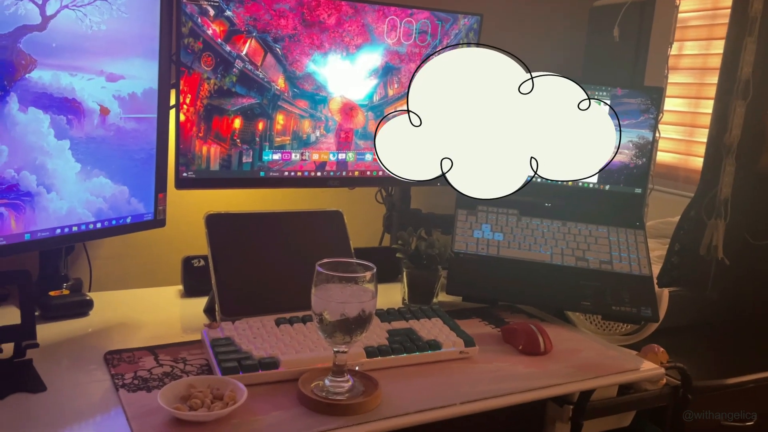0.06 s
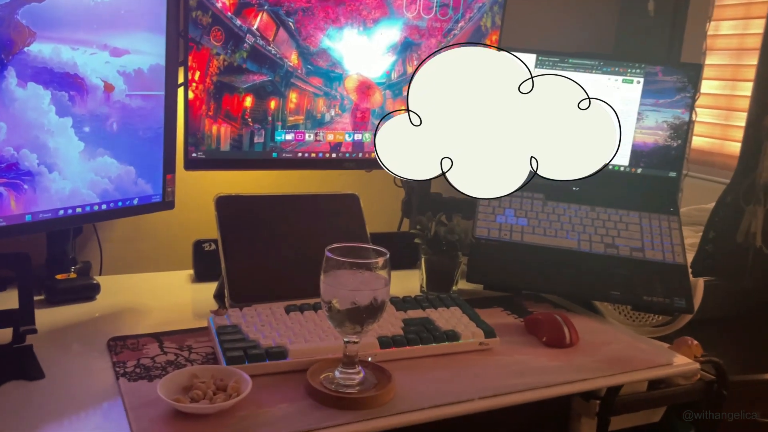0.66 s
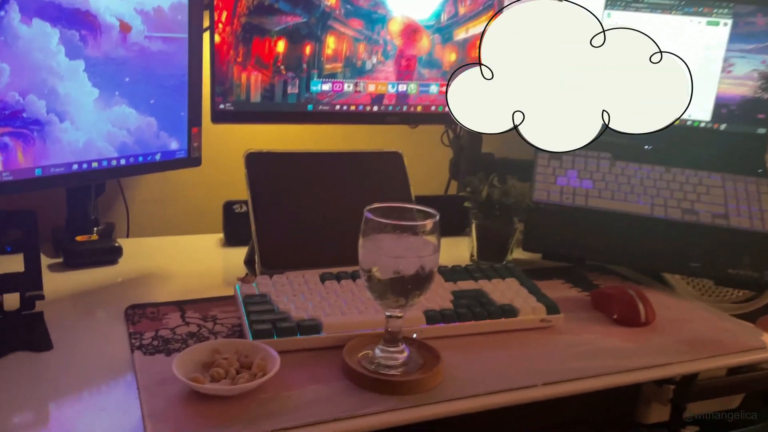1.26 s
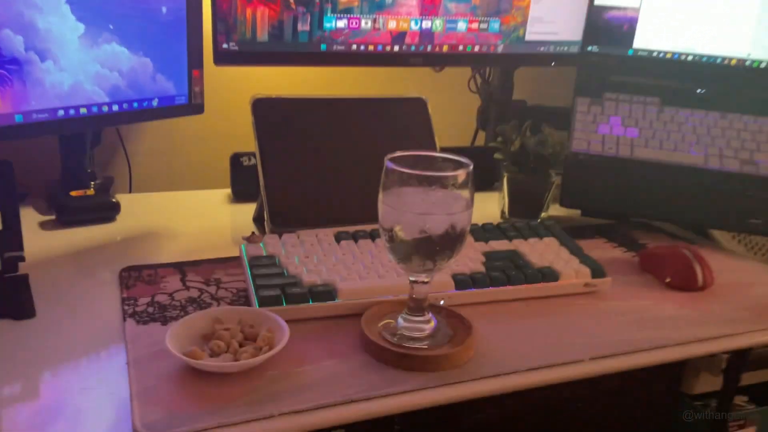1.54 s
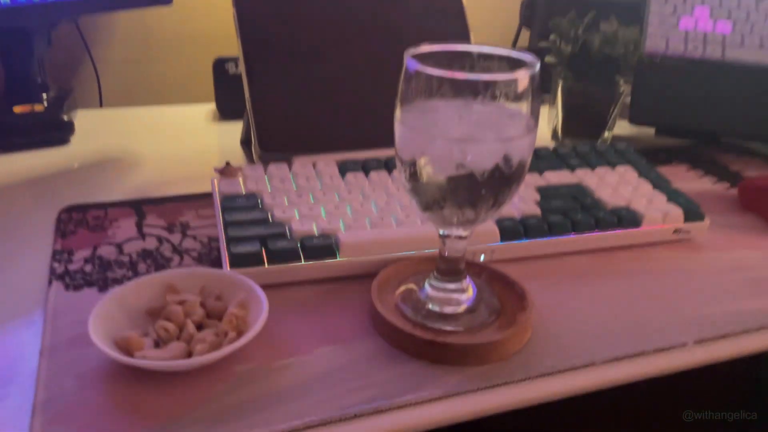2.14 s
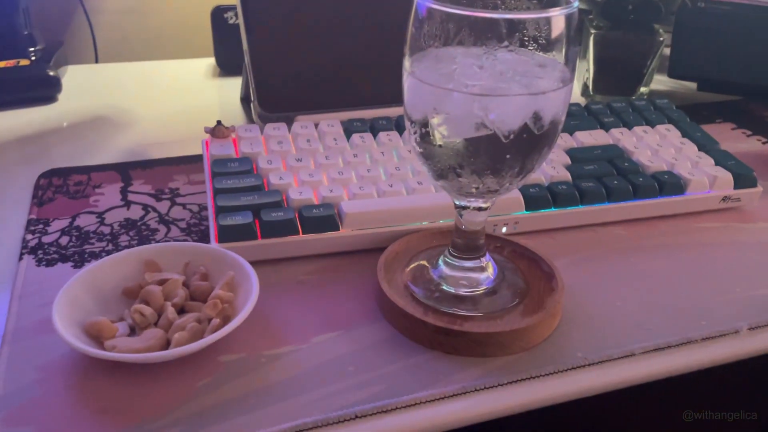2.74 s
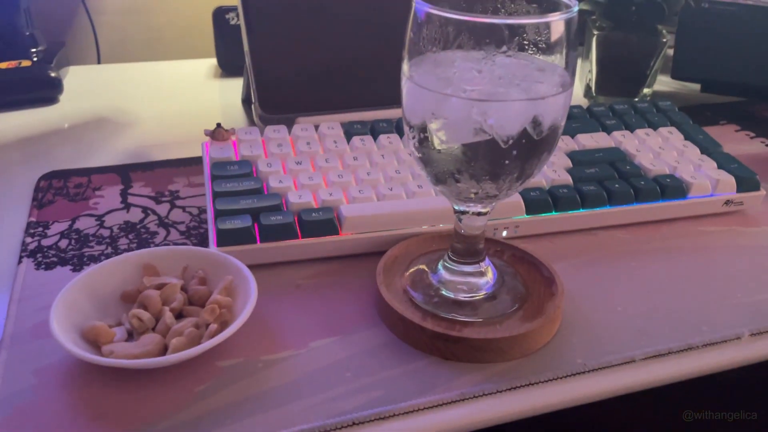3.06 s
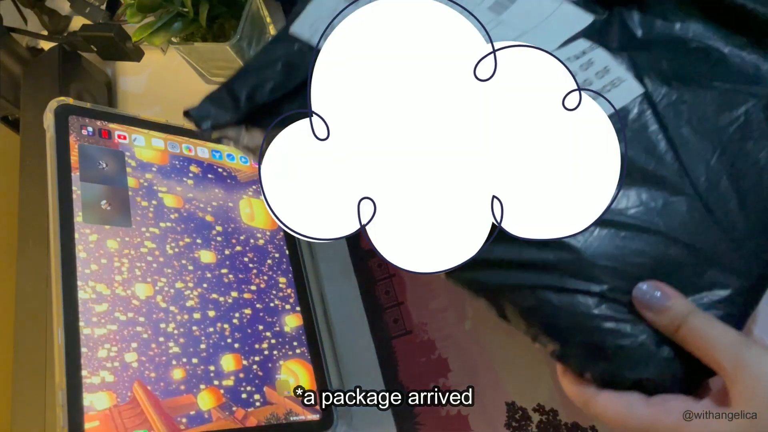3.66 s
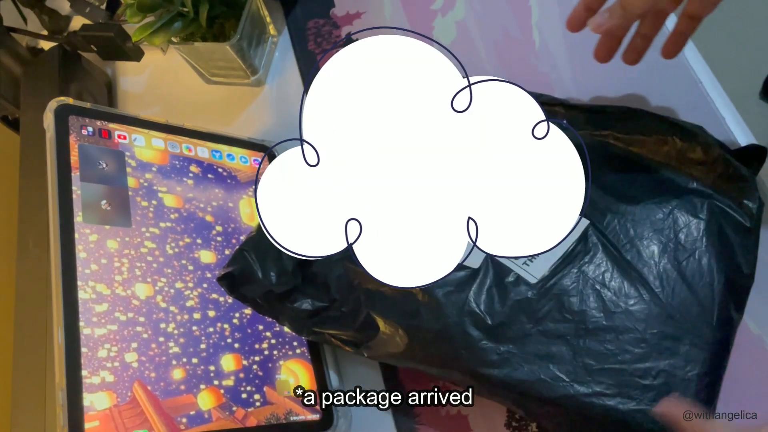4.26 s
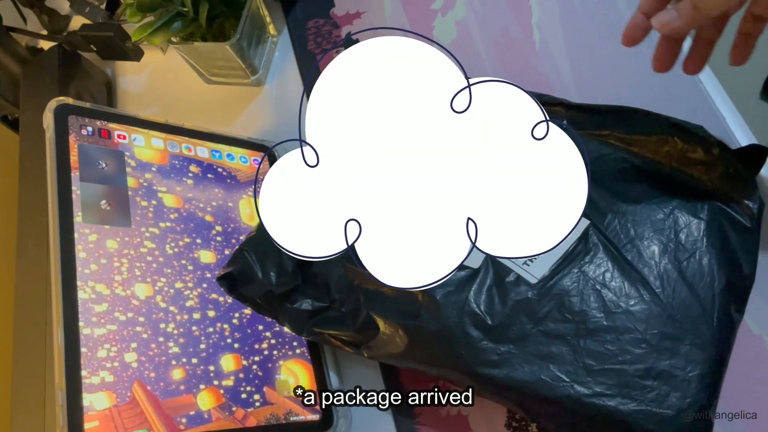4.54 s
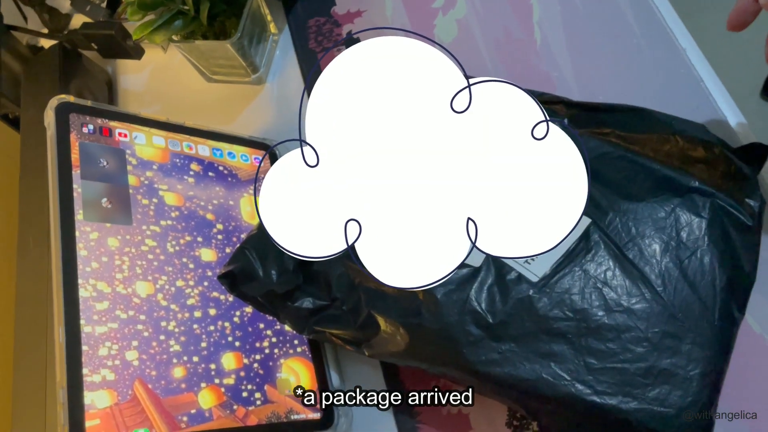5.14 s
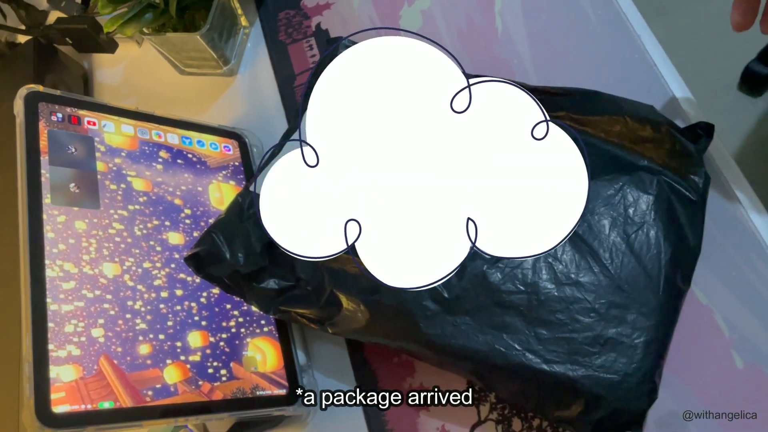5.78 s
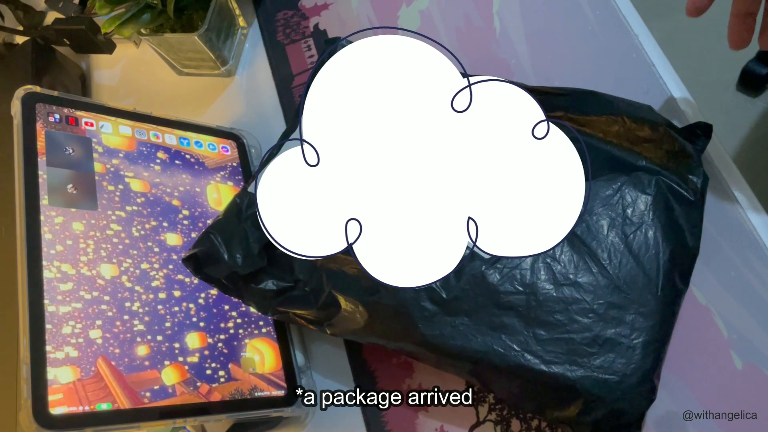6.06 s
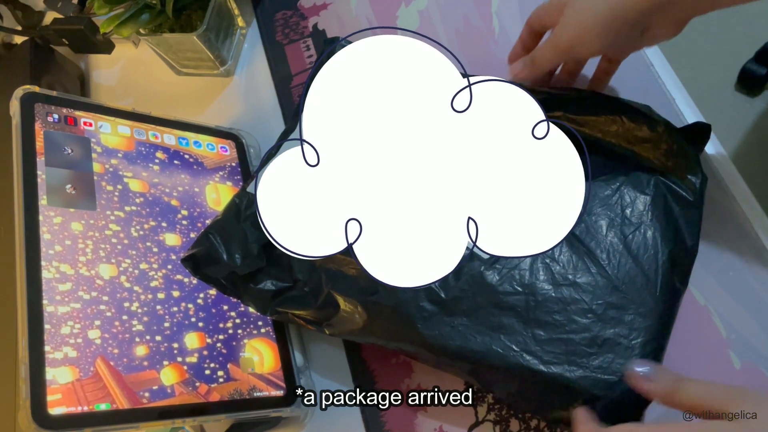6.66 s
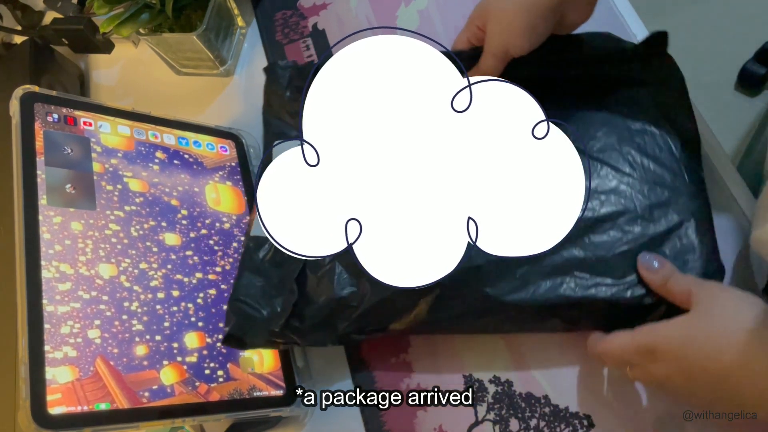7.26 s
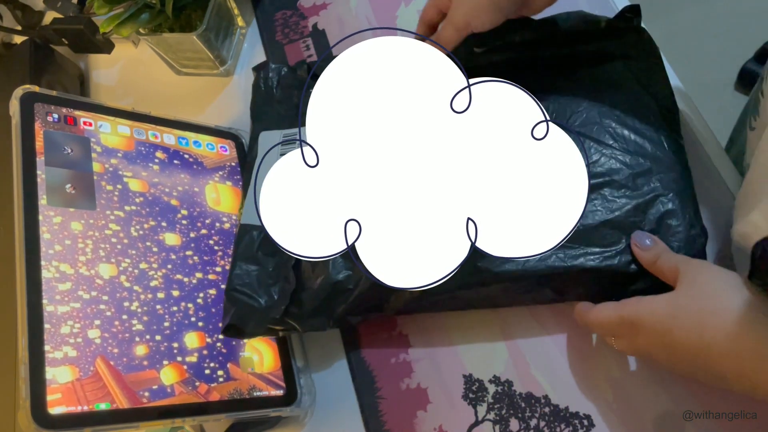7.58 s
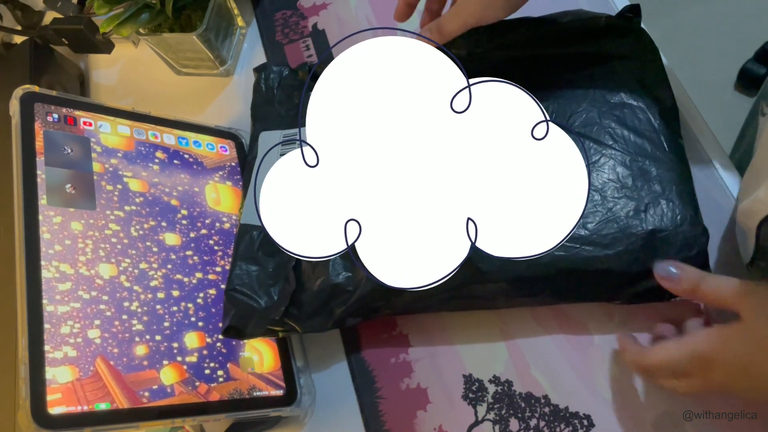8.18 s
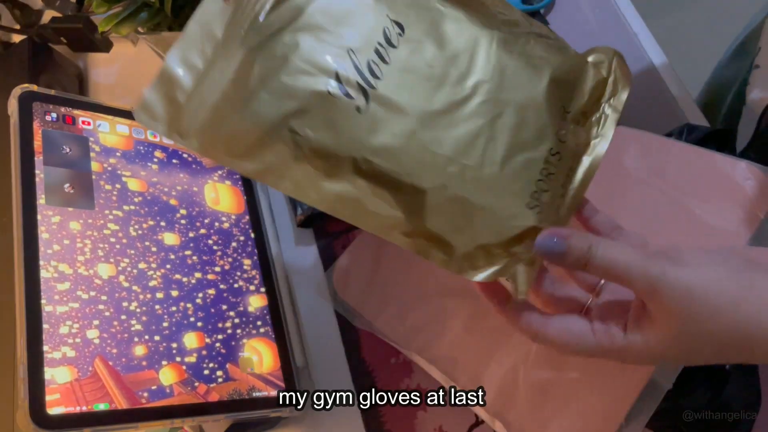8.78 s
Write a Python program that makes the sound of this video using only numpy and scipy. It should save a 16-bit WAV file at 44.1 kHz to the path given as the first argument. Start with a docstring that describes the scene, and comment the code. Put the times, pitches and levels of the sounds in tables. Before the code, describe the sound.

In a small room, cooling hums and computer fans faintly whine. The background turns quieter, with a throbbing fan, as two loud taps strike the microphone's housing. A parcel in a plastic mailer crinkles and drops onto a desk with a slap. After a pause it is gripped and slid around, the film snapping and rustling. Finally a stiff foil pouch gives a few dry clacks. Everything is close, in stereo.

```python
"""Parcel on an office desk

Close up at a desk in a small room, on a camera's stereo microphone. Cooling hums and computer fans whine;
at 3.27 s the scene changes to a quieter room tone with a fan throbbing behind. Two taps ring the camera's
case. A parcel in a plastic mailer is carried in, dropped, gripped and slid round, its film buckling
and snapping. The scene cuts again at 8.37 s, and a stiff foil pouch is handled and clacks."""
import sys
import numpy as np
from scipy import signal
from scipy.fft import rfft, irfft, next_fast_len
from scipy.io import wavfile
from scipy.ndimage import uniform_filter1d, map_coordinates

SR = 44100
rng = np.random.default_rng(int(sys.argv[2]) if len(sys.argv) > 2 else 0)


def master(y):
    """Save y as 16-bit WAV."""
    cut = np.clip(np.atleast_2d(y).T, -1, 1)
    pcm = np.round(cut * 32767)  # scale
    wavfile.write(sys.argv[1], SR, pcm.astype(np.int16))


N = 388521

# stereo width of the room at the microphone: f/Hz, side against mid/dB
ROOM_WIDTH = [(60, -13), (110, -20.5), (200, -5), (380, -3.5), (700, -3), (1300, -1), (2400, -1.5),
              (4400, -6), (8000, -2.5), (15000, 3.5)]


def mailer_rustle():
    """Each motion works the film: small creases give the bright crinkle, the bending sheet its body."""
    # carried, lowered, left to relax, gripped, slid round, let go; then the pouch is held:
    # t/s, length/s, crinkle/dB, sheet/dB, share of smooth sliding/0-1
    moves = [(3.269, 0.18, -46, -45.5, 0.3), (3.478, 0.16, -47, -51.5, 0.1), (3.663, .19, -63, -59, 0.1),
             (4.017, .19, -39, -41.5, .7), (4.298, 0.14, -73.5, -66, .3), (5.198, .55, -74, -60.5, .3),
             (6.707, .32, -51.5, -50.5, .45), (7.027, 0.16, -44, -49.5, .85), (7.211, .1, -48.5, -46, .75),
             (7.324, .26, -51, -51.5, 0.6), (7.677, 0.18, -63, -56, 0.33), (7.952, 0.17, -56, -54.5, 0.4),
             (8.145, .2, -72.5, -71, .5), (8.391, .4, -67, -60, 0.5)]
    # the parcel lands on one edge, then flops flat: same columns
    landing = [(4.127, 0.017, -23.5, -21, 0.8), (4.15, 0.0072, -27, -28, 0.65)]
    # a panel gives way under the fingers: t/s, crinkle/dB, sheet/dB
    crumples = [(3.298, -46.5, -41), (3.325, -46.5, -42), (3.348, -45.5, -40), (3.384, -44.5, -48),
                (3.523, -41.5, -42.5), (3.563, -48.5, -46), (3.762, -59.5, -49.5), (6.673, -48, -43),
                (6.759, -44.5, -50), (6.826, -45, -49), (6.873, -49.5, -48.5), (6.966, -43, -43),
                (7.525, -50, -58), (7.58, -51.5, -54), (7.795, -59.5, -53), (8.364, -53.5, -49.5),
                (8.59, -49, -45.5), (8.69, -60, -52)]
    # spectra of the crinkle and of the bending sheet: f/Hz, level/dB
    crinkle_spectrum = [(700, -26), (1600, -17), (2600, 3.5), (5000, 3.5), (7000, 2.5), (11000, -0.5),
                        (13600, -5.5), (15500, -30.5)]
    sheet_spectrum = [(120, -17), (300, -8), (520, 4), (900, -2.5), (1800, -2), (2800, -10), (5000, -33.5)]
    crumple_hold_s, crumple_slide = 0.011, 0.27
    crumpling = [(s, crumple_hold_s, *levels, crumple_slide) for s, *levels in crumples]
    bright, body, sliding = np.zeros((3, N))
    # rise and fall in dB/s
    for motions, rise, fall in [(moves, 381, 338.5), (crumpling, 1900, 522.5), (landing, 1000, 650)]:
        for s, length, crinkle_db, sheet_db, slide in motions:
            power = power_envelope(s, length, rise, fall)
            bright += amp(crinkle_db) ** 2 * power
            body += amp(sheet_db) ** 2 * power
            sliding += slide * amp(crinkle_db) ** 2 * power
    share = np.clip(sliding / bright, 0, 1)
    crinkle = film(crinkle_spectrum, share, per_second=2000, scatter_db=6.5, clump_db=5, ring_db=3.5)
    sheet = film(sheet_spectrum, share, per_second=2200, scatter_db=3, clump_db=5.5, ring_db=2)
    return amp(0.5) * np.sqrt(bright) * crinkle + amp(0.14) * np.sqrt(body) * sheet


def film(spectrum, slide_share, per_second, scatter_db, clump_db, ring_db):
    """Plastic film in motion: clumps of tiny buckles over the even hiss of sliding."""
    sizes = amp(scatter_db * np.minimum(rng.exponential(size=(2, N)), 3)) * rng.choice([-1, 1], (2, N))
    buckles = sizes * (rng.random((2, N)) < per_second / SR)
    buckles *= amp(clump_db * np.tanh(wobble(110)))
    # facets of changing size ring for a moment, each at its own pitch
    ringing = unit(patchy(buckles, ring_db, frame=256, cells=4))
    motion = np.sqrt(1 - slide_share) * ringing + np.sqrt(slide_share) * noise()
    return spread(motion, spectrum, side_db=-2)


def creases():
    """Each snapping crease cracks and rings its own small patch of film for a few cycles."""
    # the sharpest snaps and ticks, most of them creases: t/s, level/dB, f/Hz
    snaps = [(1.627, -32.5, 1610), (2.404, -44, 12000), (2.435, -32, 9800), (2.452, -36, 8000),
             (2.465, -30, 7600), (2.481, -34, 7540), (3.2565, -24.5, 3000), (3.344, -19.5, 4320),
             (3.357, -33, 9000), (3.444, -22, 6300), (3.484, -15.5, 6100), (3.498, -25, 5600),
             (3.525, -26, 1890), (3.563, -31, 2010), (3.603, -24, 11400), (3.646, -30.5, 6100),
             (3.671, -30.5, 4730), (3.728, -34.5, 4100), (3.692, -41, 9000), (3.7632, -29.5, 3180),
             (3.834, -33, 2700), (3.849, -38, 2700), (4.0052, -20, 4540), (4.017, -26, 4200),
             (4.0455, -16.5, 4830), (4.1289, -10, 1400), (4.1593, -8.5, 2220), (4.193, -17, 5000),
             (4.360, -37, 3010), (4.535, -39.5, 4330), (6.6706, -26, 4220), (6.6777, -25, 2140),
             (6.7015, -34, 2790), (6.751, -22.5, 4870), (6.768, -24, 4200), (6.8178, -28.5, 2770),
             (6.833, -29, 2800), (6.85, -29, 4600), (6.875, -31, 2150), (6.882, -29.5, 4000),
             (6.913, -37, 9000), (6.93, -25, 3100), (6.944, -25, 5100), (6.9665, -24, 4970),
             (6.975, -30, 1910), (7.022, -26, 3080), (7.108, -31, 3200), (7.22, -26.5, 1660),
             (7.242, -25, 1880), (7.26, -29, 10500), (7.294, -22.5, 3460), (7.34, -35, 9500),
             (7.3698, -27.5, 3170), (7.379, -33, 3400), (7.415, -33, 4120), (7.472, -27.5, 2970),
             (7.477, -31.5, 3600), (7.527, -34, 5600), (7.5856, -32, 2250), (7.709, -38, 3520),
             (7.732, -39, 4300), (7.787, -38, 1720), (7.80, -36, 4300), (7.986, -32.5, 5600),
             (8.02, -42, 1950), (8.0736, -27, 2820), (8.362, -43, 6040)]
    ring_cycles, ring_db = 10, -14
    track, t = np.zeros((2, N)), np.arange(8192) / SR
    onset = 1 - np.exp(-t / 0.0005)
    for s, db, hz in snaps:
        # smaller patches and harder snaps are brighter
        top_db = np.clip(-6 + 3.5 * np.log2(hz / 4000) + 0.24 * (db + 25), -20, 6)
        spectrum = [(300, -7), (1500, -2), (6000, -4.5), (13000, top_db), (16000, top_db - 13)]
        snap = coloured(burst(t60=0.011, width=0.51, hold=0.0011) * onset, spectrum)
        upper_hz = hz * rng.uniform(1, 1.5)
        patch = lambda f: 0.43 + resonance(f, hz, 0.13 * hz) + 0.7 * resonance(f, upper_hz, 0.25 * hz)
        ring = damped_sine(t, hz, ring_cycles / hz) * (1 - np.exp(-t * hz / 2))
        add(track, s, unit(filtered(snap, patch)) + amp(ring_db) * unit(ring), db - 0.5)
    return track


def desk_knocks():
    """Heavy, damped contacts with the desk: a few cycles of ring and a dull puff."""
    # dull knocks: t/s, level/dB, f/Hz, t60/s
    contacts = [(1.626, -27, 560, 0.044), (3.329, -27.5, 200, .04), (4.075, -27.5, 606, .02),
                (4.092, -34, 190, 0.034), (4.128, -11.5, 600, 0.014), (4.136, -14.5, 137, 0.041),
                (4.139, -18, 405, 0.014), (4.153, -25, 150, 0.03), (4.139, -20.5, 72, 0.15),
                (4.157, -18, 505, 0.025), (4.174, -26.5, 128, 0.14), (4.206, -32, 650, 0.031),
                (5.264, -38.5, 700, 0.064), (5.265, -35, 440, 0.034), (5.267, -25, 198, 0.06),
                (7.2455, -20, 724, 0.016), (7.2705, -26, 730, 0.02), (7.4395, -29, 690, 0.019)]
    track, t = np.zeros((2, N)), np.arange(8192) / SR
    for s, db, hz, t60 in contacts:
        ring = damped_sine(t, hz, t60) * (1 - np.exp(-t * hz * 2))
        puff = filtered(burst(t60 * 1.58, width=0.89), lambda f: resonance(f, 0.67 * hz, 1.8 * hz) ** 2)
        add(track, s, unit(ring) + 0.44 * unit(puff), db + 0.1)
    return track


def foil_pouch():
    """Stiff foil flips in quick dry steps, each a crack and a short ring; the gentle ones are duller."""
    # the pouch buckles: t/s, level/dB, cutoff/Hz
    clacks = [(8.4209, -33, 1000), (8.4293, -26.5, 3200), (8.461, -37, 2500), (8.5688, -33, 3000),
              (8.5748, -13, 14000), (8.576, -14, 9000), (8.5802, -18.5, 2410), (8.6763, -23.5, 5460),
              (8.6798, -25, 5000), (8.718, -35.5, 2500)]
    # spectrum of the crack: f/Hz, level/dB
    crack_spectrum = [(60, -25), (150, 2), (300, -7), (600, 1.5), (950, -2), (1400, 0), (2200, 1),
                      (2900, -6.5), (3900, 0.5), (5200, -5), (6800, -1.5), (8500, -9.5), (11500, -6),
                      (16000, -24)]
    # modes of the foil panel: f/Hz, width/Hz, level/dB
    modes = [(643, 230, -3), (1420, 380, -0.5), (2200, 600, -4), (4000, 420, -4), (5130, 740, -7),
             (6560, 890, -0.5)]
    track = np.zeros((2, N))
    flip = np.ones((2, 1)) * signal.unit_impulse(8192)
    panel = lambda f: sum((-1) ** k * amp(db) * resonance(f, hz, width)
                          for k, (hz, width, db) in enumerate(modes))
    ring = amp(-5.5) * unit(filtered(flip, panel))
    for s, db, cutoff_hz in clacks:
        crack = unit(coloured(burst(t60=0.019, width=0.41, hold=0.0011), crack_spectrum))
        add(track, s, filtered(crack + ring, lambda f: 1 / (1 + 1j * f / cutoff_hz) ** 2), db)
    return track


def camera_taps():
    """A tap reaches the microphone straight through the case: a hard ringing click and a hollow thud."""
    # two taps and their rebounds: t/s, click/dB, thud/dB, low ring/dB, high ring/dB
    strikes = [(3.2845, 0.5, -12.5, -16.5, 1.5), (3.2908, -20, -37, -31.5, -25),
               (3.4112, -2.5, -16.5, -6.5, -4.5), (3.4195, -19.5, -35.5, -23.5, -25),
               (3.4358, -32, -35, -28.5, -34)]
    # spectrum of the click: f/Hz, level/dB
    click_spectrum = [(300, -9), (600, -9), (950, 2), (1400, -16), (2400, 1), (3400, -21), (4100, -7),
                      (4800, 4), (6000, 1.5), (7200, -8.5), (8300, -0.5), (12000, -3), (14300, 4),
                      (16000, -4)]
    # low and high ring of the case: f/Hz, width/Hz
    rings = [(5250, 1900), (14400, 2200)]
    # hollow modes of the case: f/Hz, level/dB, t60/s
    modes = [(127.7, -5, 0.13), (204.6, -0.5, 0.0744), (333.6, -5, 0.076), (493, -16.5, .06),
             (867, -4, .04), (970, -6, .035), (2294, -2, .018)]
    track, t = np.zeros((2, N)), np.arange(SR // 4) / SR
    thud = sum((-1) ** k * amp(db) * damped_sine(t, hz, t60) for k, (hz, db, t60) in enumerate(modes))
    thud *= 1 - np.exp(-t / 0.0005)
    for s, click_db, thud_db, *rings_db in strikes:
        add(track, s, coloured(burst(t60=0.01, width=0.065, hold=0.0015), click_spectrum), click_db)
        for (hz, width), db in zip(rings, rings_db):
            impact = burst(t60=0.0078, width=0.046, hold=0.00067)
            add(track, s, filtered(impact, lambda f: resonance(f, hz, width) ** 2), db)
        add(track, s, thud, thud_db)
    return track


def throbbing_fan():
    """Behind the desk, over mains hum and soft air, each fan turn thumps its housing and chops a whine."""
    # resonances of the housing: f/Hz, width/Hz, level/dB
    housing = [(179.8, 40, -18), (241, 24, -3.5), (319, 21, 5), (358.9, 21.3, 8), (487, 69, -9),
               (622, 30, -9), (720, 73, -24)]
    # lines of the whine, lines of the mains, spectrum of the air: f/Hz, level/dB
    whine_lines = [(1308, -69), (1330, -65), (1680, -75.5), (1906, -73), (2155, -78), (2638, -80.5),
                   (3400, -83.5)]
    mains_lines = [(118.4, -57.5), (177.6, -63.5), (240, -62), (597.5, -67.5), (840, -72)]
    air_spectrum = [(22, -38.5), (36, -10), (65, -7), (150, -9), (230, -15), (280, -16), (355, -12),
                    (400, -24), (490, -17.5), (700, -24.5), (1400, -24), (3000, -31.5), (6000, -42),
                    (9600, -51), (12800, -48), (15000, -69)]
    # the whine slowly recedes; the lowest hum wavers and drops out briefly: t/s, level/dB
    whine_levels = [(4.3, 3), (5.3, 1), (7.3, -.5), (7.9, -1.5), (8.8, -4)]
    hum_levels = [(3.3, -43.5), (3.95, -49), (4.36, -48), (4.6, -46), (4.68, -63), (4.83, -41.5),
                  (5.0, -48), (5.06, -55), (5.15, -45), (5.55, -46), (5.68, -52), (6.03, -49), (6.18, -45),
                  (6.3, -48), (6.54, -47.5), (6.65, -61), (6.72, -48), (6.95, -44), (7.02, -59),
                  (7.08, -51), (7.14, -58), (7.22, -47), (7.34, -49), (7.42, -42.5), (7.75, -46.5),
                  (8.55, -49.5), (8.8, -58)]
    # the scene cuts again, and the throb resumes at another point in its turn
    turns_per_s, cut_s, cut_offset_turns = 11.99, 8.37, 0.45
    turns = (clock() - 4.341) * turns_per_s + cut_offset_turns * (clock() > cut_s)
    beats = np.diff(np.floor(turns), prepend=np.floor(turns[0])) * amp(wobble(5.4))
    throb = amp(-53.5) * resonant_bands(beats, housing)
    chop = 1 + 0.25 * np.cos(2 * np.pi * turns)
    whine = fader(whine_levels) * tones(whine_lines, drift=0.02, waver_db=1, blur=0.46) * chop
    air = amp(-51.5 + wobble(4.4)) * spread(noise(), air_spectrum, side_db=1.4)
    hum = fader(hum_levels) * tones([(60.2, 0)], drift=0.05, waver_db=2.5, blur=0.1)
    mains = amp(2) * tones(mains_lines, drift=0.0073, waver_db=0.95)
    return air + hum + throb + whine + mains


def computer_fans():
    """Small fans whirr up and ease off; their whines swell and fade as the camera moves over the desk."""
    # passing whines: t/s, length/s, f/Hz, level/dB
    passing_lines = [(0, 0.43, 2376, -62), (.1, 0.47, 2034, -65), (.6, .55, 2150, -62.5),
                     (.87, .42, 2335, -58), (1.5, 0.47, 2335, -59.5), (1.703, .3, 2022, -62),
                     (2.45, .8, 2318, -60), (2.6, 0.61, 2368, -63.5), (2.452, .75, 4790, -68.5)]
    # faint lasting whines: f/Hz, level/dB
    faint_lines = [(3009, -76.5), (3420, -77.5), (3760, -77.5), (4000, -76), (4330, -67), (4511, -76.5),
                   (4748, -73.5)]
    # bands of the whirr: f/Hz, width/Hz, level/dB
    whirr_bands = [(1141, 670, -1.5), (2030, 50, -2), (2108, 330, -1.5), (2672, 150, -12)]
    # swell of the whirr: t/s, level/dB
    whirr_levels = [(0, -74.5), (.5, -67), (.9, -61), (1.3, -54), (1.65, -55), (1.95, -57), (2.201, -56.5),
                    (3.2, -57.5)]
    whirr = resonant_bands(spread(noise(), [(1000, 0)], side_db=2), whirr_bands)
    track = amp(2.5) * fader(whirr_levels) * whirr
    for s, length, hz, db in passing_lines:
        swell = np.sqrt(power_envelope(s, length, rise=69.5, fall=69.5))
        track += swell * tones([(hz, db)], drift=0.035, waver_db=3, blur=0.7)
    return track + tones(faint_lines, drift=0.03, waver_db=3, blur=0.99)


def cooling():
    """The room's cooling: motor hum, and rushing air that fades as the camera moves away."""
    # lines of the motors and spectrum of the air: f/Hz, level/dB
    motor_lines = [(58.5, -49.5), (91.5, -48.5), (119, -41), (209.9, -50), (344.5, -55), (452, -58),
                   (581, -59), (867, -64.5), (926, -62.5), (1217, -66.5)]
    air_spectrum = [(22, -38), (45, -11), (76, -9), (108, -8.5), (132, -1.5), (165, -11), (198, -1),
                    (255, -13.5), (296, -15.5), (346, -8), (400, -18.5), (581, -16), (800, -23),
                    (1340, -28.5), (2700, -32), (4400, -34), (6500, -38.5), (8400, -49.5), (13200, -50),
                    (14600, -70)]
    fade_db_per_s = 0.47
    air = spread(patchy(noise(), depth_db=1.68, frame=2048, cells=8), air_spectrum, side_db=0.95)
    air *= amp(-36.5 - fade_db_per_s * clock() + 0.55 * wobble(7))
    return air + amp(0.5) * tones(motor_lines, drift=0.024, waver_db=1.8)


def room(x):
    """The small room's short answer, 4 ms late and dying sooner in the treble."""
    # decay of the room: f/Hz, t60/s
    decay = [(150, 0.34), (1500, 0.1996), (6000, 0.21), (14000, 0.0958)]
    hz, t, bins = signal.stft(noise(SR // 2), SR, nperseg=256)
    tail = signal.istft(bins * amp(-60 * t / along(decay, hz)[:, None]), SR, nperseg=256)[1]
    tail = np.pad(tail / np.linalg.norm(tail[0]), ((0, 0), (SR // 250, 0)))
    return signal.fftconvolve(x, tail, axes=1)[:, :N]


def microphone_ports(x):
    """The two ports cancel one treble band in their sum and another in their difference."""
    dip = lambda f, hz, width: 1 - 0.9 * resonance(f, hz, width)
    lift = lambda f: 1 + 0.6 * resonance(f, 8200, 1530)
    mid = filtered((x[0] + x[1]) / 2, lambda f: dip(f, 8200, 2511))
    side = filtered((x[0] - x[1]) / 2, lambda f: dip(f, 11515, 2200) * lift(f))
    return np.array([mid + side, mid - side])


def tones(lines, drift, waver_db, blur=0):
    """Wandering machine lines, blurred by turbulence, that reach the two ports with different phases."""
    t, track = clock(), np.zeros((2, N))
    for hz, db in lines:
        phase = 2 * np.pi * (hz * t + rng.random()) + drift * np.sqrt(hz) * wobble(5) + blur * wobble(45)
        offset = np.arctan(amp(along(ROOM_WIDTH, hz) - 5)) * rng.choice([-1, 1])
        gain = np.sqrt(2) * amp(db + waver_db * wobble(2.982))
        track += gain * np.sin([phase + offset, phase - offset])
    return track


def amp(db):
    """Decibels to gain."""
    return 10 ** (np.asarray(db) / 20)


def unit(x):
    """Scale to rms 1."""
    return x / np.sqrt(np.mean(x ** 2) + 1e-20)


def along(points, hz):
    """Read (f/Hz, value) points on a log frequency axis."""
    f, values = np.transpose(points)
    return np.interp(np.log(hz + 1), np.log(f + 1), values)


def clock():
    """The time of every sample."""
    return np.arange(N) / SR


def noise(size=N):
    """Two unrelated white noises."""
    return rng.standard_normal((2, size))


def wobble(rate):
    """A smooth random curve, rate knots a second."""
    return map_coordinates(rng.standard_normal(int(N * rate / SR) + 4), [clock() * rate])


def fader(points):
    """Gain that follows (t/s, level/dB) points."""
    return amp(np.interp(clock(), *np.transpose(points)))


def power_envelope(s, length, rise, fall):
    """Power that rises until time s, holds for its length and dies away; slopes in dB/s."""
    t = clock() - s
    db = np.minimum(rise * t, 0) - fall * np.maximum(t - length, 0)
    return amp(np.maximum(db, -150)) ** 2


def damped_sine(t, hz, t60):
    """One mode ringing down."""
    return np.sin(2 * np.pi * hz * t) * amp(-60 * t / t60)


def resonance(f, hz, width):
    """Response of one damped mode."""
    return 1j * f * width / (hz * hz - f * f + 1j * f * width)


def filtered(x, response):
    """x through a complex frequency response."""
    n = x.shape[-1]
    padded = next_fast_len(n + 8192)
    return irfft(rfft(x, padded) * response(np.fft.rfftfreq(padded, 1 / SR)), padded)[..., :n]


def resonant_bands(x, bands):
    """x through parallel (f/Hz, width/Hz, level/dB) bands, at rms 1."""
    response = lambda f: sum(amp(db) * resonance(f, hz, width) ** 2 for hz, width, db in bands)
    return unit(filtered(x, response))


def coloured(x, spectrum, size=2048):
    """x through a minimum-phase filter with the given spectrum."""
    cepstrum = irfft(np.log(amp(along(spectrum, np.fft.rfftfreq(size, 1 / SR)))))
    cepstrum[1:size // 2] *= 2
    cepstrum[size // 2 + 1:] = 0
    impulse = irfft(np.exp(rfft(cepstrum)))
    return signal.fftconvolve(x, impulse[None], axes=1)[:, :x.shape[1]]


def patchy(x, depth_db, frame, cells):
    """x with random patches of gain, the given number of spectrogram cells wide and long."""
    bins = signal.stft(x, nperseg=frame)[2]
    field = rng.standard_normal(bins.shape[1:])
    for axis in (0, 1):
        field = uniform_filter1d(field, size=cells, axis=axis)
    return signal.istft(bins * amp(depth_db * unit(field)), nperseg=frame)[1][:, :N]


def spread(pair, spectrum, side_db):
    """Two unrelated signals become coloured stereo of rms 1; near sources have less side."""
    response = lambda f: amp(along(spectrum, f) + [0 * f, along(ROOM_WIDTH, f) + side_db])
    mid, side = filtered(pair, response)
    return unit(np.array([mid + side, mid - side]))


def burst(t60, width, hold=0, size=8192):
    """A puff of stereo noise that holds and dies; width is side against mid."""
    mid, side = noise(size) * amp(-60 * np.maximum(np.arange(size) / SR - hold, 0) / t60)
    return np.array([mid + width * side, mid - width * side])


def add(track, s, sound, db):
    """Put a sound on the track at time s with peak level db."""
    part = track[:, round(s * SR):][:, :sound.shape[-1]]
    part += (amp(db) * sound / np.abs(sound).max())[..., :part.shape[1]]


def scene():
    """Close handling a little left of centre, over one room tone and then the other."""
    change_s, crossfade_s = 3.27, 0.019
    later = np.clip((clock() - change_s) / crossfade_s, 0, 1)
    background = np.sqrt(1 - later) * (cooling() + computer_fans()) + np.sqrt(later) * throbbing_fan()
    hits = creases() + desk_knocks() + foil_pouch()
    rustle = mailer_rustle()
    handling = rustle + hits + room(amp(-15) * hits + amp(-16.5) * rustle)
    airborne = background * amp([[0.3], [-0.3]]) + handling * amp([[0.8], [-0.8]])
    taps = camera_taps()
    return microphone_ports(airborne) + taps + amp(-29.5) * room(taps)


def record(dry):
    """The camera overloads at full scale and keeps nothing above its band limit."""
    top_hz = 16300
    return filtered(np.clip(dry, -1, 1), lambda f: 1 / (1 + (f / top_hz) ** 120))


dry = scene()
out = record(dry)
master(out)
```